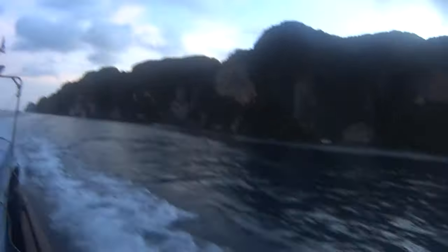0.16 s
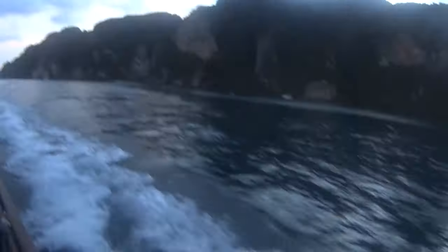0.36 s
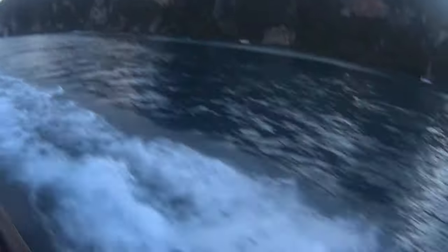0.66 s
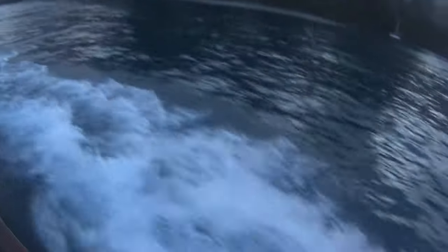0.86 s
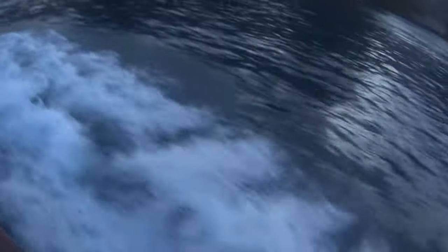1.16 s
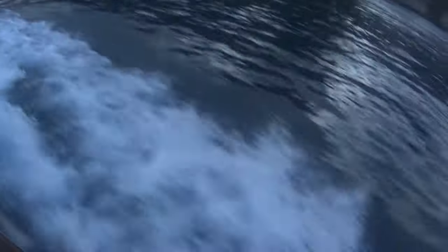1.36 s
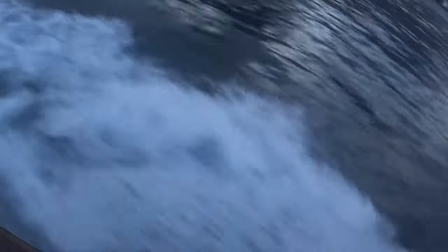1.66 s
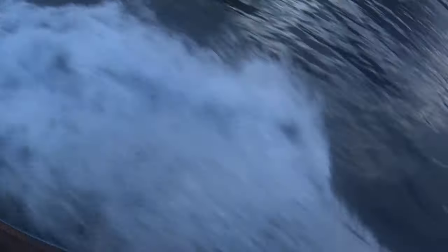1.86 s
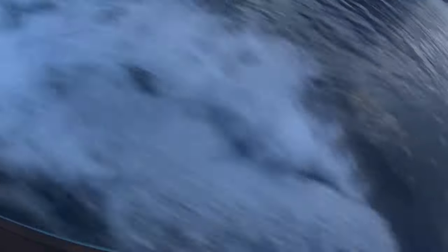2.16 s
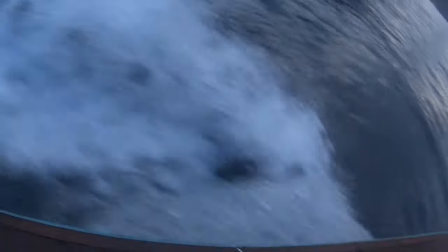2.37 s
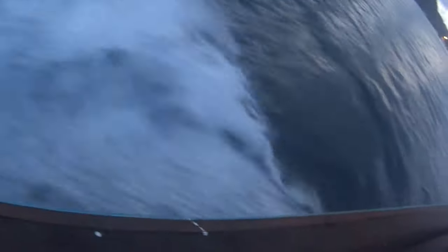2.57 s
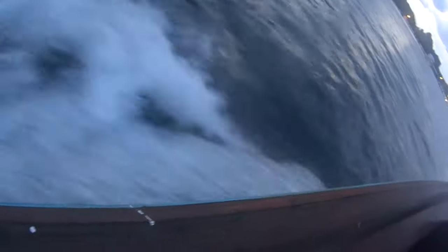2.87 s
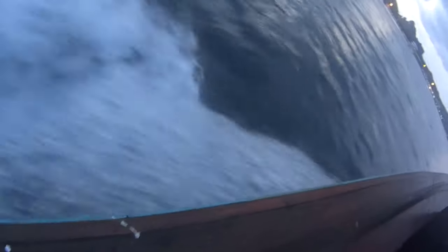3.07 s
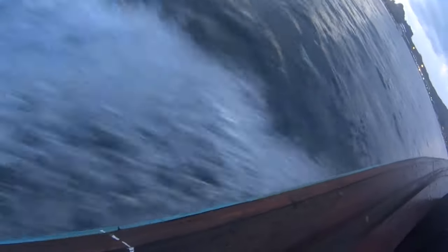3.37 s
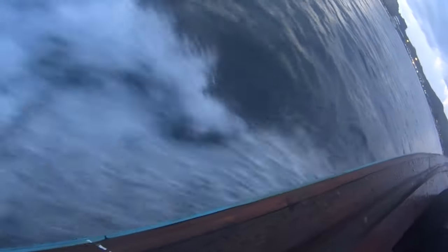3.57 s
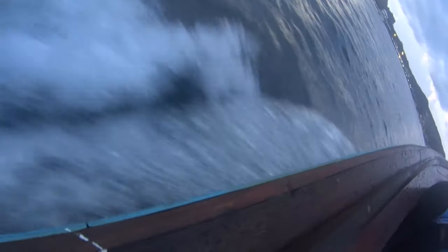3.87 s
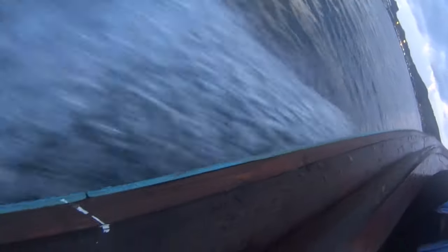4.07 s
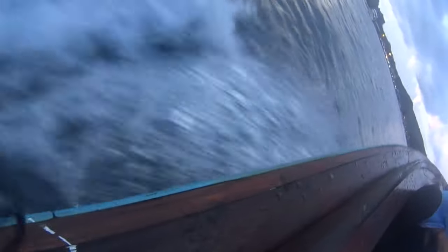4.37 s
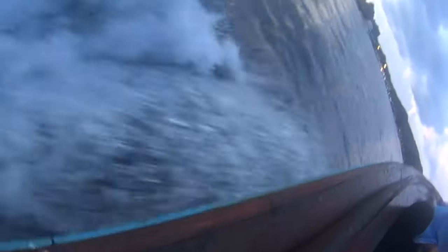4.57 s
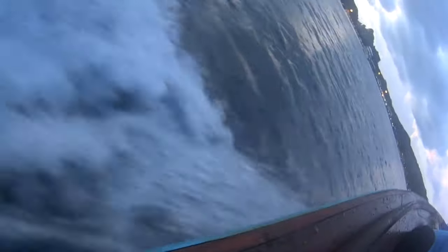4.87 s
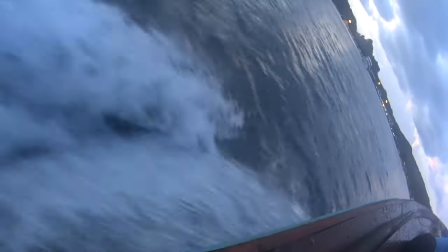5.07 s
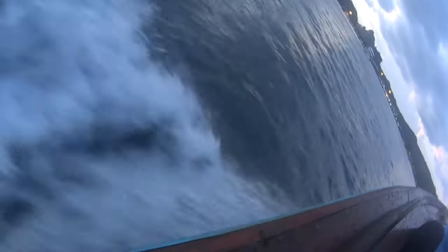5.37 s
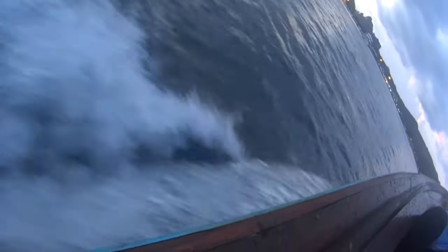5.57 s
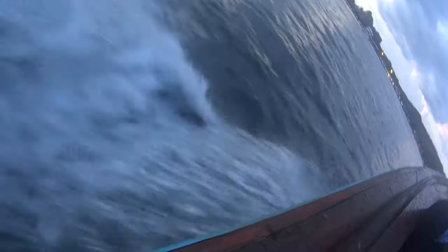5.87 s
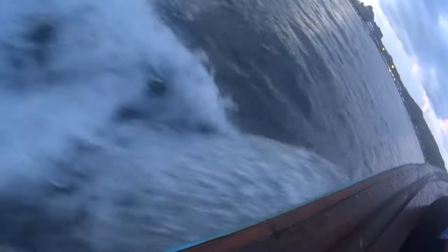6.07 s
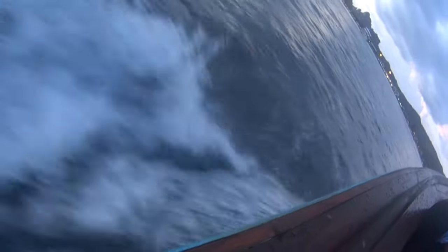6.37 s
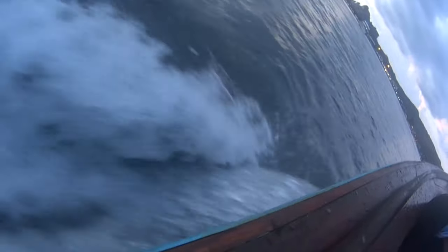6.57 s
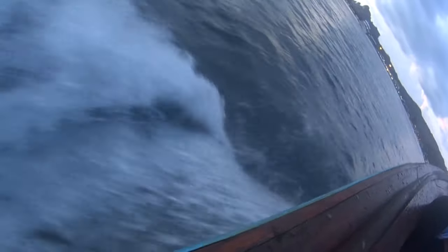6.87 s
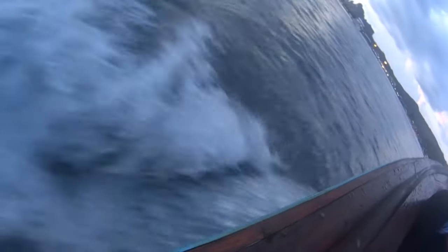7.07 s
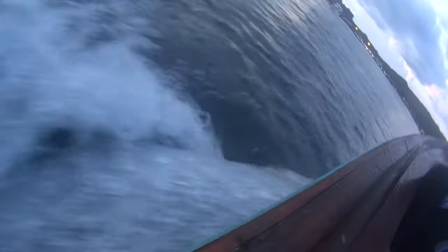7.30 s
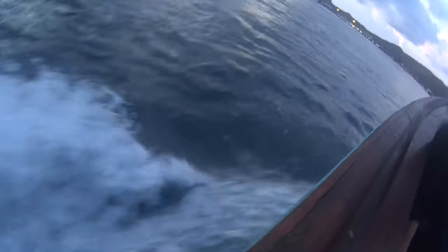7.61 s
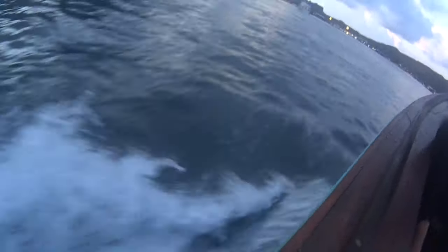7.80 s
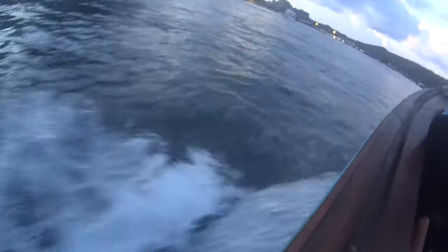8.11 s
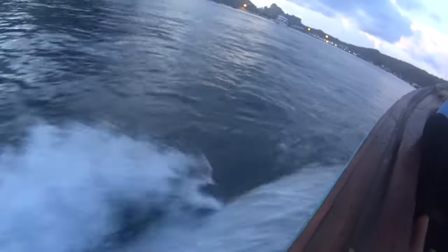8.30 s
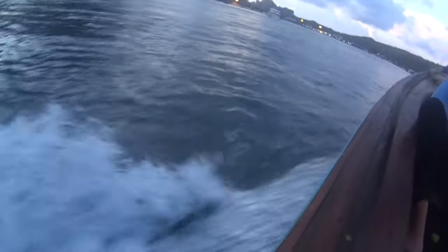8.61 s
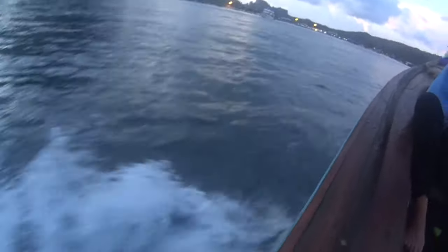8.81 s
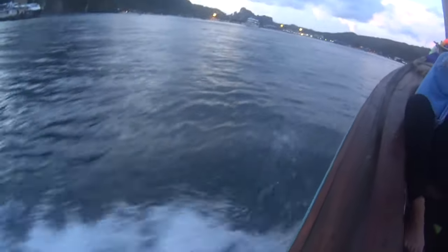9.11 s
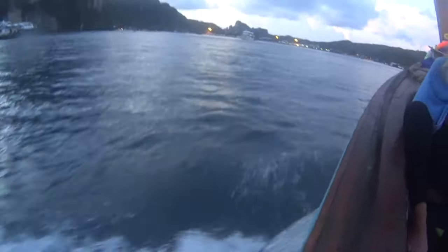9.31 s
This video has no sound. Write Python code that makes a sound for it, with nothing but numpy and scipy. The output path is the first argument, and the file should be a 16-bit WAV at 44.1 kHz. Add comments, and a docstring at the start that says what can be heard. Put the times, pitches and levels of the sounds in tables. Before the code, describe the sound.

Foaming seawater roars along a moving boat's hull, with a low motor hum, a few drops tapping the microphone and late wind thumps.

```python
"""Open sea, heard from a small cased camera near the bow of a cruising longtail boat, held over its side.
The bow wave rushes and fizzes: bubble bursts over noise, coloured by the case; filtered noise is the wash.
The engine drones from the stern as sine harmonics of its firing rate, with puffs of noise as clatter.
Big bubbles plop as short rising sines and drops tap the case as noise bursts. Wind buffets the microphone
once at the start and repeatedly near the end, each eddy a flap of noise and a low thump."""
import sys
import numpy as np
from scipy import signal
from scipy.fft import rfft, irfft
from scipy.io import wavfile
from scipy.ndimage import uniform_filter1d

SR = 44100
rng = np.random.default_rng(int(sys.argv[2]) if len(sys.argv) > 2 else 0)


def materialize(psi):
    """Save the field psi as 16-bit PCM at rate SR to the path in sys.argv[1].

    A 1-D psi becomes a single channel; in a 2-D psi each row is a channel.
    """
    bounded = np.clip(np.atleast_2d(psi).T, -1, 1)
    quanta = np.round(bounded * 32767).astype(np.int16)
    wavfile.write(sys.argv[1], SR, quanta)


N = 416744
TIME = np.arange(N) / SR
FREQS = np.fft.rfftfreq(4096, 1 / SR)  # grid on which filters are drawn


def undb(db):
    """Level law: decibels to amplitude gain."""
    return 10 ** (np.asarray(db) / 20)


def unit(x):
    """Normalisation: scale to rms 1."""
    return x / np.sqrt(np.mean(x ** 2))


def curves(table):
    """Linear interpolation: draw each column of a timed table out to every sample."""
    start_s, *columns = np.transpose(table)
    return [np.interp(TIME, start_s, column) for column in columns]


def spectrum(points):
    """Logarithmic frequency scale: join (frequency, value) points along it."""
    hz, value = np.transpose(points)
    return np.interp(np.log(FREQS + 1), np.log(hz), value)


def colour(x, db):
    """Minimum-phase filtering: fold the cepstrum to get a causal response with db at each of FREQS."""
    cepstrum = irfft(db * np.log(10) / 20)
    half = len(cepstrum) // 2
    cepstrum[1:half] *= 2
    cepstrum[half + 1:] = 0
    response = irfft(np.exp(rfft(cepstrum)))[:half]
    return signal.oaconvolve(np.atleast_2d(x), response[None], axes=1)[:, :N]


def butter(x, hz, kind, order=2):
    """Butterworth filtering: a maximally flat low-, high- or band-pass."""
    sections = signal.butter(order, hz, kind, fs=SR, output="sos")
    return signal.sosfilt(sections, x)


def walk(rate):
    """Band-limited chance: random knots, rate per second, joined by lines and scaled to rms 1."""
    knots = rng.standard_normal(4096)
    return unit(np.interp(TIME * rate, np.arange(len(knots)), knots))


def flicker(rate):
    """Fast modulation: chance less its running mean, so it never stays high or low for long."""
    quick = walk(rate)
    return unit(quick - uniform_filter1d(quick, int(4 * SR / rate)))


def bursts(per_s, scatter_db):
    """Poisson impulses: bursting bubbles as clicks of either sign, many small and a few large."""
    happens = rng.random((2, N)) < per_s / SR
    size_db = scatter_db * np.minimum(rng.exponential(size=(2, N)), 3)
    sign = rng.choice([-1, 1], (2, N))
    return unit(happens * undb(size_db) * sign)


def place(table, voice, seconds=0.084):
    """Superposition: add voice(t, other columns) at each row's time, scaled to its peak level."""
    t = np.arange(int(seconds * SR)) / SR
    out = np.zeros(N + len(t))
    for start_s, peak_db, *rest in table:
        sound = voice(t, *rest)
        start = min(int(start_s * SR), N)
        out[start:start + len(t)] += undb(peak_db) * sound / np.abs(sound).max()
    return out[:N]


# How alike a wide water source is at the two ports: frequency [Hz], likeness [0-1]
PORT_LIKENESS = [(100, 0.87), (500, 0.95), (790, 0.75), (1150, 0.92), (1500, 0.97), (2300, .88),
                 (3200, 0.92), (4700, .96), (6800, 0.81), (8600, .78), (9500, 0.95)]


def spread(pair):
    """Partial coherence: two unrelated noises become sum and difference signals of a wide source."""
    alike = np.clip(spectrum(PORT_LIKENESS), 0, .995)
    mid = colour(pair[0], 10 * np.log10((1 + alike) / 2))
    side = colour(pair[1], 10 * np.log10((1 - alike) / 2))
    return np.vstack([mid + side, mid - side])


# Air resonances and notches of the camera case: frequency [Hz], width [Hz], height [dB]
CASE_RESONANCES = [(1286, 175, 6.5), (1380.5, 135, 8), (1740, 240, 3.5), (2040, 160, -1), (2492, 330, 7),
                   (3290, 290, 1.6), (4636, 1200, 5), (5500, 180, -2.5), (9100, 740, -10)]


def case(x):
    """Cavity resonance: the air in the case strengthens some pitches and weakens others."""
    response_db = 0
    for hz, width_hz, height_db in CASE_RESONANCES:
        response_db = response_db + height_db / (1 + (2 * (FREQS - hz) / width_hz) ** 2)
    return colour(x, response_db)


# Slow course of the bow wave, before the quick surges:
# start_s [s], level_db [dB], churn_db below 1.6 kHz [relative dB], spray_db above 6 kHz [relative dB]
BOW_WAVE_COURSE = [(0, -15, -1.5, -0.3), (0.4, -16, 0.9, 0.6), (1.0, -15, -0.5, 1), (1.65, -15.5, 0.5, 1),
                   (2.3, -15, -1.5, 0.7), (3.2, -15, -0.0, -1), (4.0, -15, -1.5, -0.9),
                   (5.2, -15, -0.4, -0.8), (5.8, -15.5, 0.5, -0.8), (6.3, -15, -0.9, 0.3),
                   (7.1, -15.5, -0.5, -0.0), (8.05, -16, 1.9, 0.5), (8.7, -15.5, 1.5, -0.3),
                   (9.45, -16, 2, 0.5)]
# Spectral density of breaking foam, before the case: frequency [Hz], density [relative dB per Hz]
FOAM_SPECTRUM = [(400, -31.5), (800, -15), (1100, -5), (1400, -3.5), (2000, -2), (2900, 0.5), (3800, -4),
                 (6100, -6.5), (7200, -10.5), (8200, -15.5), (9200, -18.5), (11000, -29.5)]
# Where the camera points: start_s [s], forward [0 = out over the wake, 1 = along the hull]
CAMERA_HEADING = [(0, 0.48), (1.0, 0.11), (2.1, 0.16), (2.8, 0.93), (7.2, 0.94), (7.9, 0.22), (8.4, .4),
                  (9.45, 0.019)]


def bow_wave(fizz_db=-4, droplet_db=-10, tumble_db=0.18, patchy_db=0.66, flutter_db=1., clump_db=4.2,
             chop_per_s=10, surge_db=.35, churn_surge_db=.6, spray_surge_db=.7,
             pan_db=1.0, far_foam_db=3.5, near_water_db=0.5):
    """Bubble noise: dense bursts over a hiss, modulated band by band as small waves meet the bow."""
    level_db, churn_db, spray_db = curves(BOW_WAVE_COURSE)
    level_db = level_db + surge_db * flicker(chop_per_s)
    churn_db = churn_db + churn_surge_db * flicker(chop_per_s)
    spray_db = spray_db + spray_surge_db * flicker(chop_per_s)
    forward, = curves(CAMERA_HEADING)
    turn = forward - forward.mean()
    foam = rng.standard_normal((2, N)) + undb(fizz_db) * bursts(per_s=6000, scatter_db=4)
    # thrown water lands in clumps of droplets
    clumps = undb(droplet_db + clump_db * flicker(110))
    droplets = clumps * bursts(per_s=1700, scatter_db=5.0)
    foam_bins, droplet_bins = rfft(foam), rfft(droplets)
    tumble, flutter = flicker(55), flicker(85)
    edges_hz = [300, 1100, 1600, 2200, 3000, 4200, 6000, 8000, 12000]
    hz = np.fft.rfftfreq(N, 1 / SR)
    out = 0
    for lo, hi in zip(edges_hz, edges_hz[1:]):
        # large bubbles follow the churn; the finest, and the falling droplets, follow the spray
        large = np.interp(lo, [1100, 1600], [1, 0])
        fine = np.interp(lo, [2200, 6000], [0, 1])
        # pointing forward fades the far foam and brightens the water at the planks
        far = np.interp(lo, [1100, 1600, 2200], [0, 1, 0])
        near = np.interp(lo, [1600, 2200, 3000], [0, 1, 0])
        db = large * churn_db + fine ** 2 * spray_db
        db = db + turn * (near * near_water_db - far * far_foam_db)
        db = db + tumble_db * tumble + fine * flutter_db * flutter
        db = db + patchy_db * flicker(55)  # each band has its own patches
        band = (hz >= lo) & (hz < hi)
        out = out + irfft((foam_bins + fine * droplet_bins) * band, N) * undb(db)
    rush = unit(case(colour(spread(out), spectrum(FOAM_SPECTRUM))))
    left_db = pan_db * forward / 2  # pointing forward moves the wave to the left
    return rush * undb(level_db + np.array([left_db, -left_db]))


# Exhaust firing: start_s [s], firing rate before wobble [Hz]
FIRING_RATE = [(0, 79.5), (1, 78.8), (1.9, 78.5), (2.3, 78.8), (2.65, 78.7), (3.5, 80.4), (4.45, 81.5),
               (4.95, 80.7), (6.15, 81.1), (7, 80.2), (8.4, 80.8), (9.45, 80.8)]
# Exhaust harmonics, rms before unevenness: multiple of the firing rate,
# inboard_db with the camera inboard [dB], outboard_db with it over the side [dB]
EXHAUST_LINES = [(1, -57, -54.5), (1.5, -65, -62), (2, -52, -50.5), (2.5, -60, -60), (3, -50, -57),
                 (4, -60, -61), (5, -60, -59), (6, -55, -52), (7, -57, -57), (8, -52, -59), (9, -55, -62)]


def engine(wobble=0.0019, uneven_db=0.5, clatter_db=-49, puff_cycles=0.25):
    """Harmonic series: exhaust lines on an unsteady firing rate, with a noisy puff at each firing."""
    rate_hz, = curves(FIRING_RATE)
    cycles = np.cumsum(rate_hz * (1 + wobble * walk(14))) / SR
    overboard = np.interp(TIME, [1.8, 3.6], [0, 1])  # the camera moves out over the side
    drone = 0
    for multiple, inboard_db, outboard_db in EXHAUST_LINES:
        db = inboard_db + overboard * (outboard_db - inboard_db) + uneven_db * walk(6.5)
        line = np.sin(2 * np.pi * (multiple * cycles + rng.random()))
        drone = drone + np.sqrt(2) * undb(db) * line
    puffs = np.exp(-(cycles % 1) / puff_cycles) * rng.standard_normal(N)
    clatter = unit(butter(puffs, [200, 900], "bandpass"))
    return drone + undb(clatter_db) * clatter


# Water shouldered aside by the hull, before the gains in wash():
# start_s [s], slosh_db [relative dB], gurgle_db [relative dB]
WASH_COURSE = [(0, -43, -43), (.7, -39, -44), (1.3, -40, -51), (2, -40, -38), (3.7, -40.5, -39.5),
               (4.3, -38.5, -36), (5, -39.5, -40), (7.5, -40, -38), (8.4, -40.5, -38), (9.45, -36, -45)]
# Spectral density of the slosh: frequency [Hz], density [relative dB per Hz]
SLOSH_SPECTRUM = [(25, 1), (60, 3.5), (95, -8.5), (140, -1), (300, 0.5), (450, 1.5), (620, 3.5),
                  (800, -2.5), (1200, -4.5), (2500, -31.5)]
# Spectral density of the hollow gurgle: frequency [Hz], density [relative dB per Hz]
GURGLE_SPECTRUM = [(150, -29), (290, -8.5), (370, -1), (470, 1.5), (570, -6.5), (800, -31.5)]


def wash(slosh_gain_db=3, gurgle_gain_db=-1, glug_db=-4, heave_db=1.3):
    """Shaped noise: water sloshes along the planks and gurgles in the hollow under the bow wave."""
    slosh_db, gurgle_db = curves(WASH_COURSE)
    layers = [(SLOSH_SPECTRUM, slosh_db + slosh_gain_db), (GURGLE_SPECTRUM, gurgle_db + gurgle_gain_db)]
    out = 0
    for shape, db in layers:
        water = rng.standard_normal((2, N)) + undb(glug_db) * bursts(per_s=500, scatter_db=3.0)
        coloured = unit(colour(spread(water), spectrum(shape)))
        out = out + coloured * undb(db + heave_db * walk(22))
    return out


# Wind eddies hitting the microphone, before the gains in wind():
# start_s [s], flap peak [relative dB], thump peak [relative dB]
WIND_EDDIES = [(0.087, -19.5, -37), (7.714, -29, -30), (8.089, -24, -39), (8.561, -22, -46),
               (8.651, -26.5, -38), (8.697, -22, -34), (8.75, -20, -32), (8.79, -20.5, -37),
               (8.903, -20, -30), (8.936, -17, -28), (8.958, -16, -31), (9.062, -12, -26.5),
               (9.091, -18.5, -24), (9.111, -20, -34), (9.188, -21, -26), (9.21, -18.5, -31),
               (9.227, -29, -29.5), (9.343, -16, -33), (9.44, -20, -30)]


def wind(flap_gain_db=5.0, thump_gain_db=7.0):
    """Turbulent pressure: each eddy gives a flap and a thump."""
    flaps = place([(start_s, flap_db) for start_s, flap_db, _ in WIND_EDDIES], flap)
    thumps = place([(start_s, thump_db) for start_s, _, thump_db in WIND_EDDIES], thump)
    return undb(flap_gain_db) * flaps + undb(thump_gain_db) * thumps


def flap(t, swell_s=0.0011, lo_hz=260, hi_hz=950):
    """Transient turbulence: an eddy flaps across the port for a few milliseconds."""
    swell = t * np.exp(-t / swell_s)
    return butter(rng.standard_normal(len(t)) * swell, [lo_hz, hi_hz], "bandpass")


def thump(t, fade_s=0.011, start_hz=135, sag_per_s=12, ragged=0.83):
    """Damped rebound: the eddy's suction springs back in a ragged low thump that sags in pitch."""
    rebound = -np.sin(2 * np.pi * start_hz * t / (1 + sag_per_s * t))
    swirl = unit(butter(rng.standard_normal(len(t)), [80, 300], "bandpass"))
    return np.exp(-t / fade_s) * (rebound + ragged * swirl)


# Big bubbles beside the hull: start_s [s], level_db at the peak [dB], pitch_hz at the onset [Hz]
BIG_BUBBLES = [(2.093, -26, 630), (4.327, -24, 335), (6.968, -30, 490), (7.106, -29, 490),
               (7.175, -19.5, 705), (8.031, -25, 570)]


def plops():
    """Bubble resonance: each big bubble sounds at its own pitch."""
    return place(BIG_BUBBLES, plop)


def plop(t, pitch_hz, swell_s=0.0045, glide_per_s=.6):
    """Damped oscillation: a bubble swells, rings and rises a little in pitch."""
    swell = t * np.exp(-t / swell_s)
    return swell * np.sin(2 * np.pi * pitch_hz * t * (1 + glide_per_s * t))


# Drops tapping the case: start_s [s], level_db at the peak [dB]
CASE_DROPS = [(1.262, -5), (1.277, -10), (1.291, -23), (7.026, -6), (7.055, -3), (8.285, -17)]


def drops():
    """Local impact: each port hears a drop in its own way, so each gets its own noise."""
    return np.array([place(CASE_DROPS, tap) for _ in range(2)])


def tap(t, fade_s=.002, lo_hz=1900, hi_hz=2900):
    """Impact noise: a drop splats on the case in a fast-fading burst."""
    return butter(rng.standard_normal(len(t)) * np.exp(-t / fade_s), [lo_hz, hi_hz], "bandpass")


def scene(choke_db=-18):
    """Superposition of sources: sea all around, engine astern, wind and drops on the camera itself."""
    gusts = wind()
    centre = engine() + plops() + gusts
    # the hardest eddies choke the port, so the rush dips for a moment
    pressure = uniform_filter1d(gusts ** 2, size=660) / undb(choke_db) ** 2  # 15 ms mean
    return bow_wave() / (1 + pressure) + wash() + centre + drops()


# The camera's wind filter: frequency [Hz], gain [dB]
BASS_CUT = [(25, -21), (62, -16), (80, -3), (110, 0)]
# Balance of the two microphone ports: frequency [Hz], left minus right [dB]
LEFT_OVER_RIGHT = [(100, 1.5), (500, 2), (650, -0.7), (850, 3), (1300, -1.7), (1800, -0.5), (2500, 1),
                   (4500, -0.5), (6000, 0.1), (7500, 2), (9500, -0.5)]
# Phase between the two microphone ports: frequency [Hz], lead of the left [rad]
LEFT_LEAD = [(100, -0.32), (1150, -0.32), (1600, -0.14), (3500, -0.16), (6200, -0.32), (9300, -.05)]


def record(dry):
    """Transducer response: bass cut, unequal ports, rounded peaks and a steep treble limit."""
    cut = colour(dry, spectrum(BASS_CUT))
    # log gain and phase between the ports, half to each side
    tilt = spectrum(LEFT_OVER_RIGHT) * np.log(10) / 20 + 1j * spectrum(LEFT_LEAD)
    tilt = np.interp(np.fft.rfftfreq(N, 1 / SR), FREQS, tilt)
    ports = irfft(rfft(cut) * np.exp(np.array([tilt, -tilt]) / 2), N)
    rounded = ports / (1 + (ports / .8) ** 8) ** (1 / 8)
    top_hz = 11100
    treble_limit = signal.ellip(12, .1, 80, top_hz, fs=SR, output="sos")
    return signal.sosfilt(treble_limit, rounded)


dry = scene()
out = record(dry)
materialize(out)
```